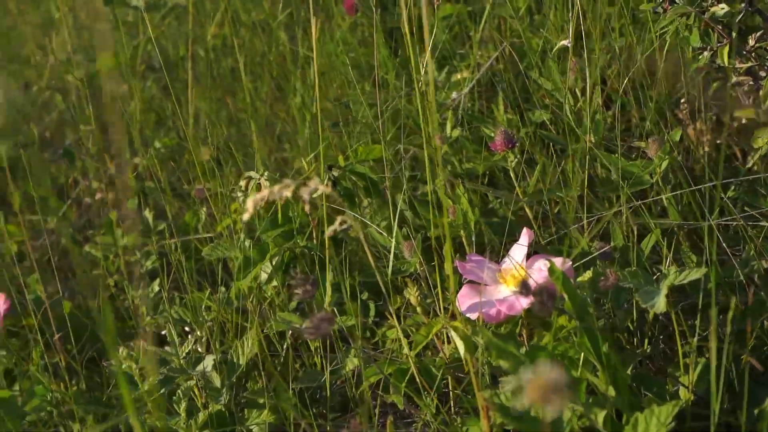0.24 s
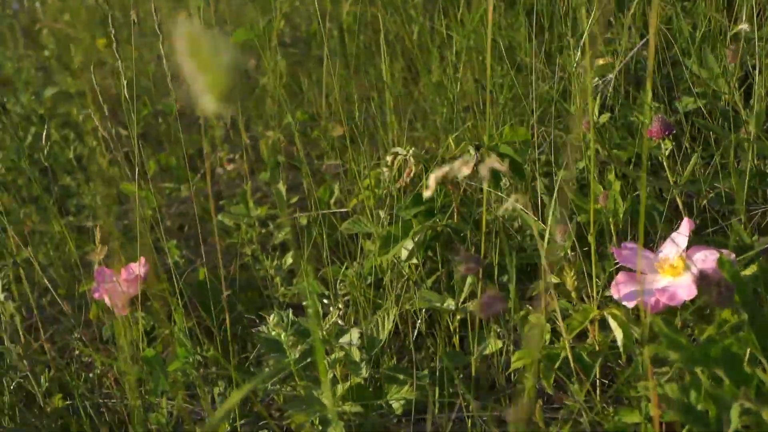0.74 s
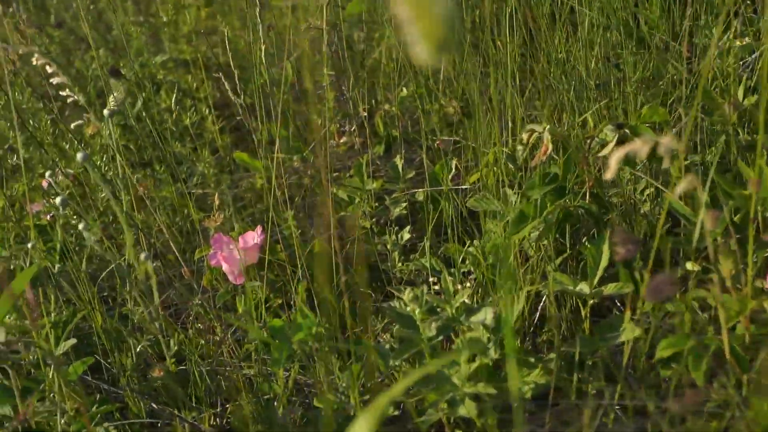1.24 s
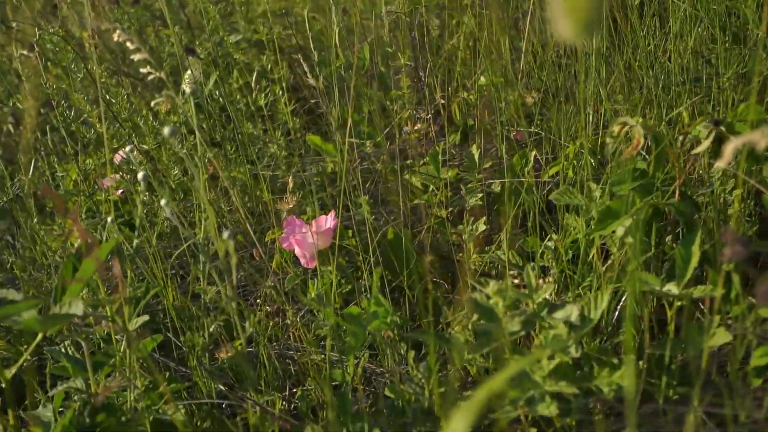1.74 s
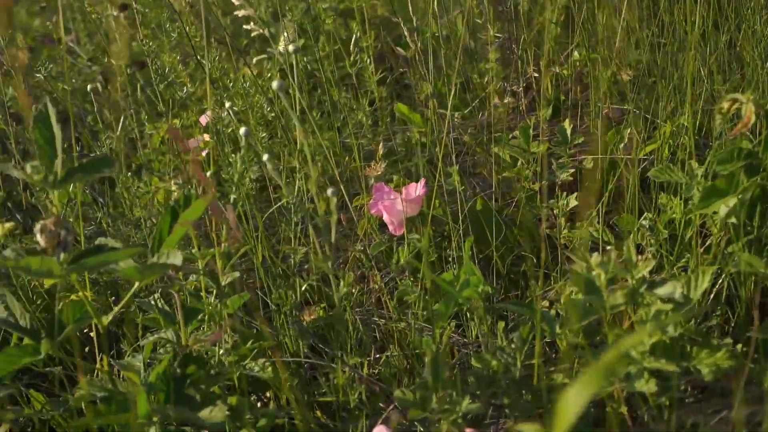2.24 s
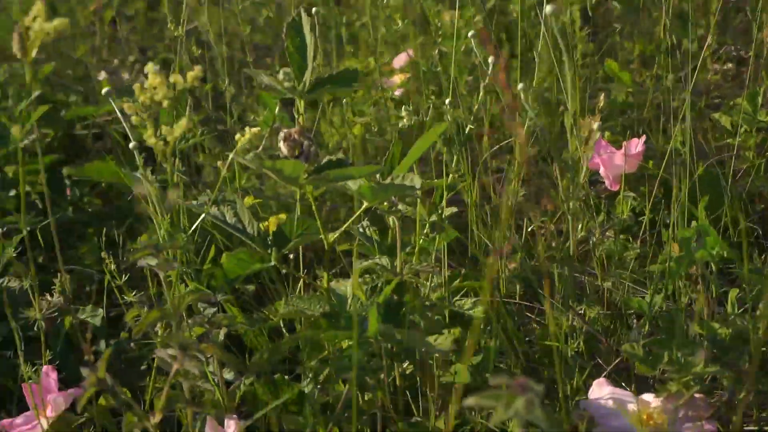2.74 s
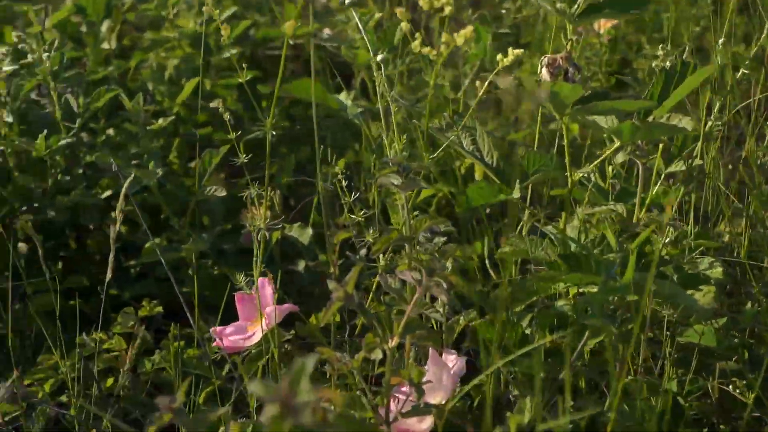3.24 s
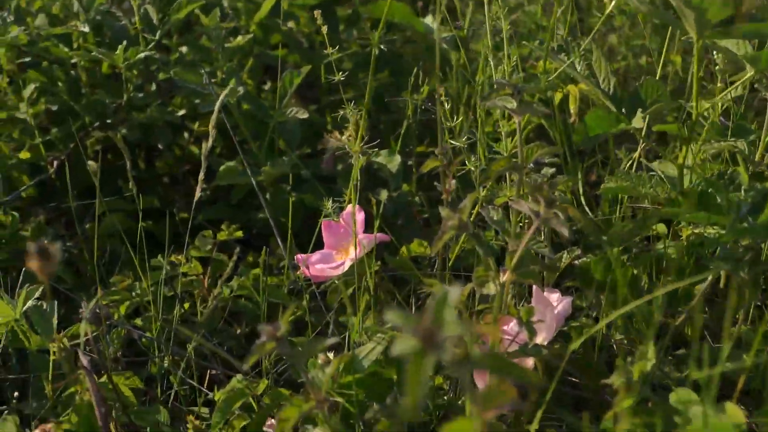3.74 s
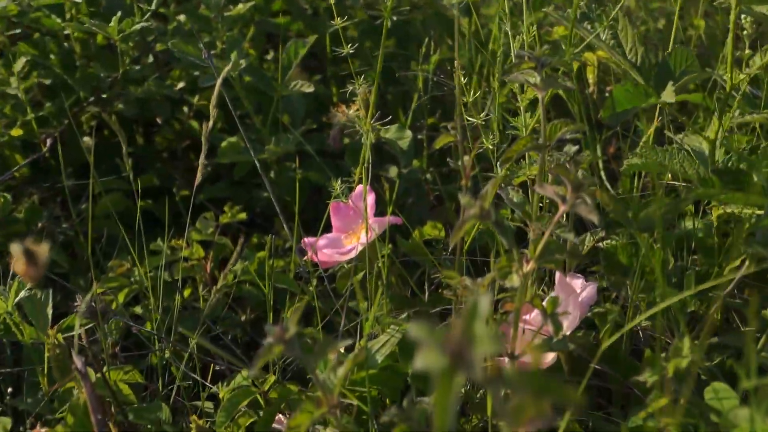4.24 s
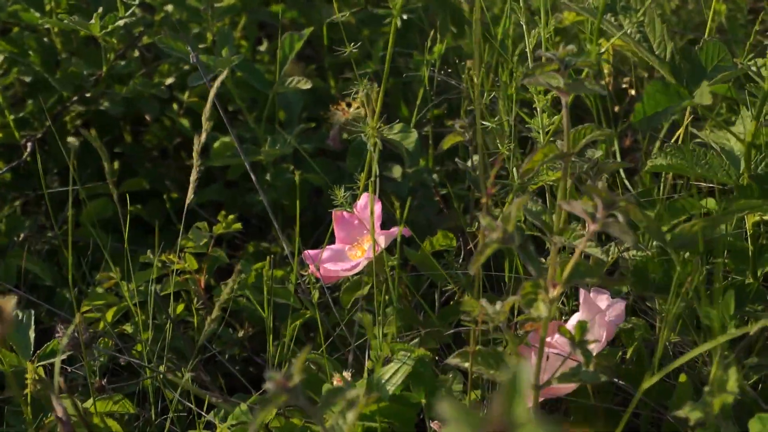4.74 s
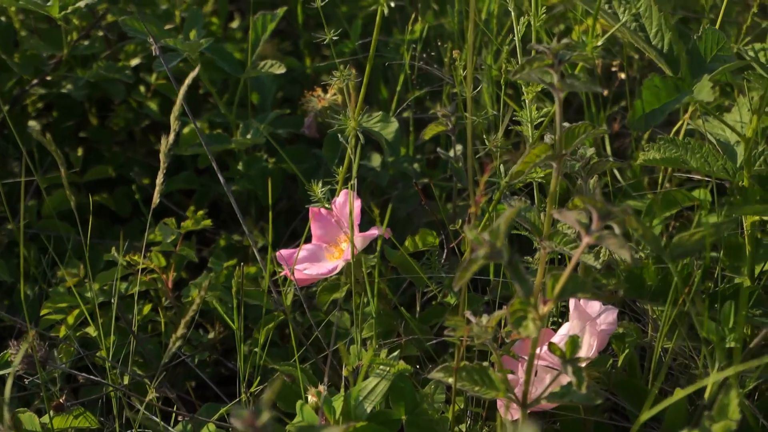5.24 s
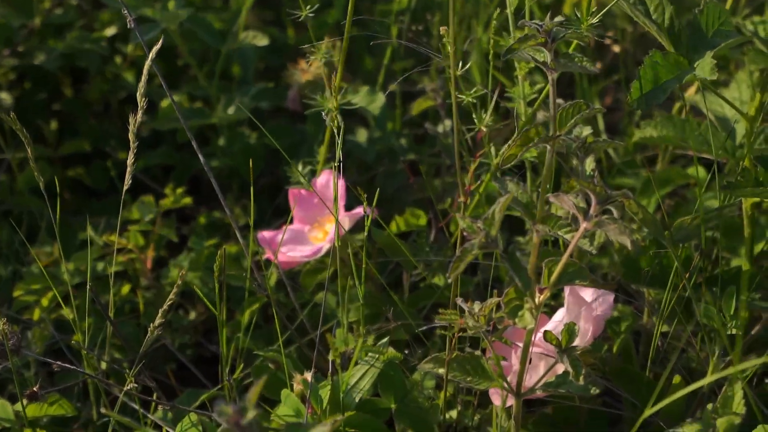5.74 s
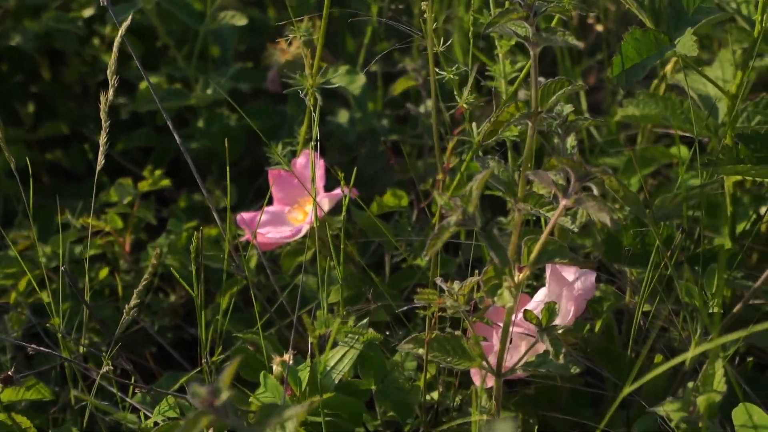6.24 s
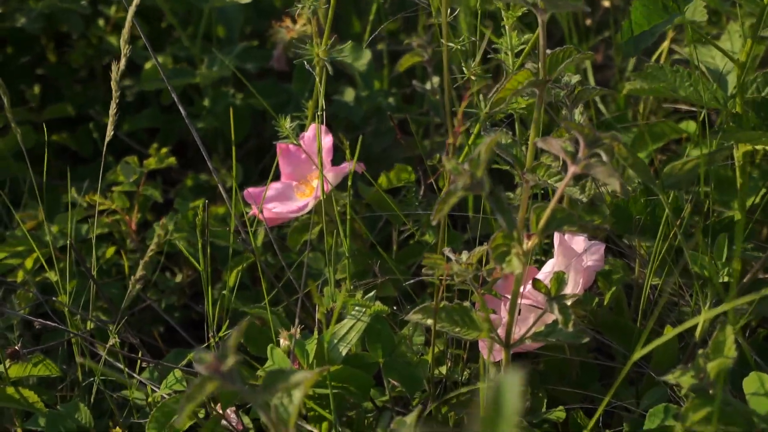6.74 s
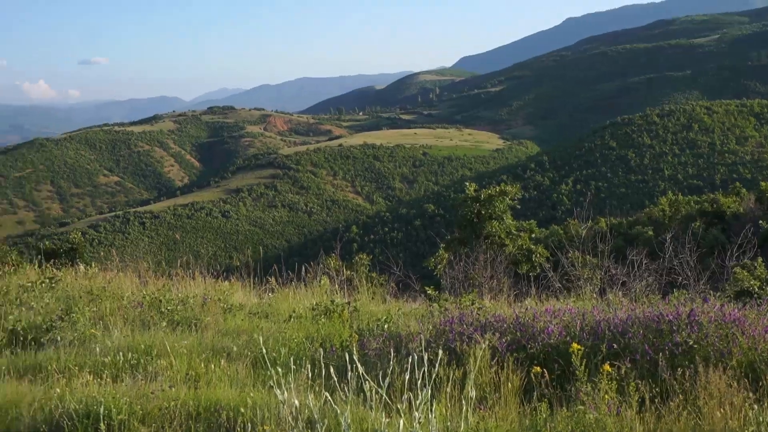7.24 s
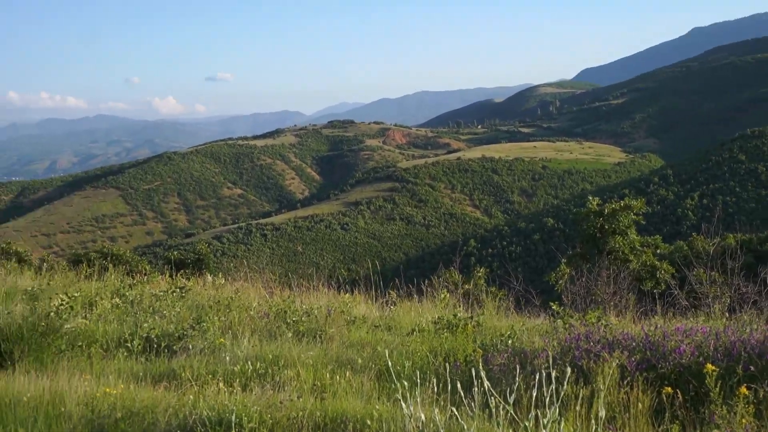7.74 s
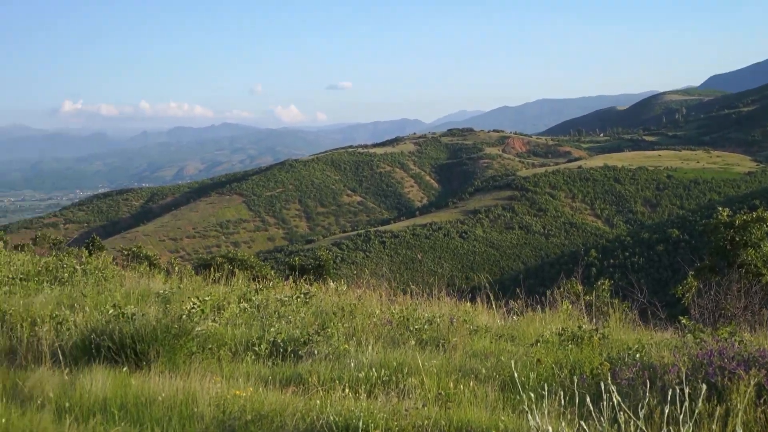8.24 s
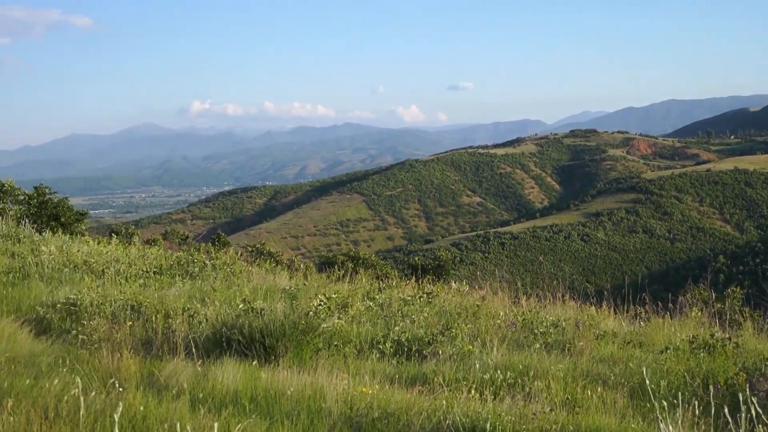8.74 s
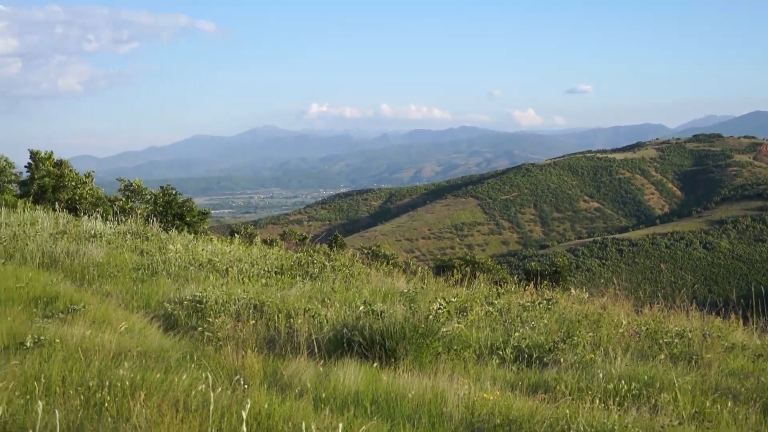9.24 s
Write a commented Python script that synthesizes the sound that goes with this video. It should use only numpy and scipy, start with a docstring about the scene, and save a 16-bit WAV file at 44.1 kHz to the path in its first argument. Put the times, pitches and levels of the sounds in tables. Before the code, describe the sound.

Several field crickets chirp in rapid overlapping pulses over faint meadow rustle, with deep wind buffeting the microphone and a late songbird warbling.

```python
"""Field crickets in a windy meadow

Near crickets stridulate: each chirp is four wing strokes, each stroke a short sagging tone near 5 kHz.
Shaped noise makes wind on a bare microphone, rustling leaves and a far chorus; clicks and knocks ring
the resonances of grass stalks and microphone housing; late on a songbird whistles, warbles and trills
in gliding sines. Decaying noise, convolved with crickets and bird, is the echo from the grass."""
import sys
import numpy as np
from scipy import signal
from scipy.fft import rfft, irfft
from scipy.io import wavfile
from scipy.ndimage import uniform_filter1d

SR = 44100
rng = np.random.default_rng(int(sys.argv[2]) if len(sys.argv) > 2 else 0)


def digitize_waveform(pressure):
    """Quantize a signal to 16-bit integers and store it at the path in sys.argv[1].

    Rows of a 2-D input are taken as channels; values are limited to [-1, 1].
    """
    field = np.atleast_2d(pressure).T
    bounded = np.clip(field, -1, 1)
    quanta = np.round(bounded * 32767).astype(np.int16)
    wavfile.write(sys.argv[1], SR, quanta)


N = 418950

# resonances of the microphone housing: f/Hz, relative level/dB, 60 dB decay time after a bump/s
HOUSING = [(141.6, 6.5, 0.25), (245, -18.5, 0.35)]
# share sent into the grass echo, rising toward 5 s and dropping near 7.2 s: t/s, level/dB
SCATTER = [(0, -16.5), (2.5, -11), (3.1, -7.5), (5, -6.5), (6.9, -7), (7.25, -14.5), (9.5, -13)]


def from_db(db):
    """Level to amplitude: 20 dB is a factor of ten."""
    return 10 ** (np.asarray(db) / 20)


def rms_one(x):
    """Normalization: division by the root mean square."""
    return x / np.sqrt(np.mean(x ** 2) + 1e-20)


def in_time(rows):
    """Linear interpolation of each column of a curve table at every sample."""
    s, *columns = np.transpose(rows)
    return [np.interp(np.arange(N) / SR, s, column) for column in columns]


def add(track, start_s, sound):
    """Superposition: a sound is summed into a track at its start time."""
    i = max(round(start_s * SR), 0)
    track[i:i + len(sound)] += sound[:N - i]


def drift(rate_hz):
    """Low-passed noise: a slow random curve of zero mean and spread 1."""
    step = 40  # samples between the points of the curve
    pole = np.exp(-2 * np.pi * rate_hz * step / SR)
    white = rng.standard_normal(N // step + 2002)
    slow = signal.lfilter([1], [1, -2 * pole, pole * pole], white)[2000:]  # past the onset
    return np.interp(np.arange(N) / step, np.arange(len(slow)), rms_one(slow - slow.mean()))


def coloured(spectrum):
    """Spectral shaping: white noise weighted by a spectrum over log frequency, rms 1."""
    hz, db = np.transpose(spectrum)
    grid_hz = np.arange(N // 2 + 1) * SR / N + 1  # +1 avoids log(0)
    gain = from_db(np.interp(np.log(grid_hz), np.log(hz), db))
    return rms_one(irfft(rfft(rng.standard_normal(N)) * gain, N))


def band_pass(x, low_hz, high_hz, order=2):
    """Band limiting: a Butterworth filter keeps one band."""
    return signal.sosfilt(signal.butter(order, [low_hz, high_hz], "band", fs=SR, output="sos"), x)


def ring(x, hz, t60):
    """Damped resonance: a unit click sets off a sine of initial height 1, 60 dB down after t60 seconds."""
    radius = from_db(-60 / (t60 * SR))
    angle = 2 * np.pi * hz / SR
    feedback = [1, -2 * radius * np.cos(angle), radius * radius]
    return signal.lfilter([0, np.sin(angle)], feedback, x + 1e-18)


def wind():
    """Turbulent pressure: lumpy low noise follows the gusts; the housing hums, more in strong rumble."""
    # gusts on the microphone: t/s, deep pressure level/dB, upper rumble level/dB
    gusts = [(0.0, -24, -22.5), (0.05, -21, -46), (0.45, -36, -48), (1.85, -43, -55), (2.56, -38.5, -44),
             (2.88, -20, -28), (3.6, -18.5, -33), (3.73, -9.5, -24), (4.39, -29.5, -38), (5.18, -16, -28),
             (6.08, -30.5, -40), (6.48, -19.5, -29.5), (6.82, -19, -38), (6.93, -34, -59), (7.33, -18, -20),
             (7.59, -19.5, -33.5), (8.65, -20.5, -27.5), (8.71, -6, -20.5), (8.89, -28, -34),
             (9.15, -4.5, -18), (9.34, -16, -29), (9.5, -32.5, -34)]
    # spectrum of the pressure: f/Hz, level per Hz/dB
    pressure_spectrum = [(5, -0.5), (16, -1), (30, -3.5), (89, -19), (146, -30.5), (222, -40.5), (300, -56),
                         (500, -81), (900, -114)]
    # handling keeps the housing humming: t/s, level/dB
    handling = [(0, -56), (.6, -48), (2.5, -46), (3.5, -49.5), (9.5, -49.5)]
    split_hz = 42

    def split(x, side):
        return signal.sosfilt(signal.butter(3, split_hz, side, fs=SR, output="sos"), x)

    deep_db, rumble_db = in_time(gusts)
    push = coloured(pressure_spectrum)
    # slow swells of the noise are evened out: the gusts set the level
    push = push / np.sqrt(uniform_filter1d(push ** 2, size=6000) + 0.061)
    deep = rms_one(split(push, "low"))
    rumble = rms_one(split(push, "high"))

    handling_gain = from_db(in_time(handling)[0] + 2.5 * drift(6))
    gust_gain = from_db(0.72 * rumble_db - 35.5 + 7.6 * drift(5.1))
    white = rng.standard_normal(N)
    # the hum is damped more than the ring of a bump
    hum = rms_one(sum(from_db(db) * rms_one(ring(white, hz, 0.42 * t60)) for hz, db, t60 in HOUSING))
    return from_db(deep_db) * deep + from_db(rumble_db) * rumble + (handling_gain + gust_gain) * hum


def air():
    """Broadband friction noise: meadow rustle, a lumpy murmur under it, a crackly dry-stalk hiss above."""
    # leaves in the breeze, with a short low thud at 7.23 s in the murmur column:
    # t/s, relative levels of murmur/dB, rustle/dB, hiss/dB
    breeze = [(0, -63, -58, -68.5), (2.3, -66, -55.5, -69), (3.2, -55, -55.5, -65.5),
              (4, -62, -56.5, -68.5), (5.9, -63.5, -56.5, -69), (6.55, -49, -55.5, -72),
              (7.17, -65.5, -56, -70.5), (7.23, -39.5, -54.5, -73), (7.3, -63.5, -56, -71.5),
              (9.5, -62.5, -56.5, -70.5)]
    # spectrum of the rustle: f/Hz, level per Hz/dB
    rustle_spectrum = [(150, -2.5), (330, -0.5), (630, 3.5), (800, -0.5), (1100, 0), (2000, -5.5),
                       (3300, -9.5), (5500, -9), (7000, -16), (15600, -49)]
    murmur_db, rustle_db, hiss_db = in_time(breeze)
    murmur_noise = rms_one(band_pass(rng.standard_normal(N), 165, 297))
    murmur = from_db(murmur_db + 3.0 * drift(8.5)) * murmur_noise
    crackle = rng.standard_normal(N) * from_db(1.2 * drift(60))
    hiss = from_db(hiss_db + 3.5) * rms_one(band_pass(crackle, 3400, 10700, order=1))
    rustle = from_db(rustle_db + 2.5 + 1.07 * drift(2.4)) * coloured(rustle_spectrum)
    return murmur + rustle + hiss


def stroke(hz, catch_hz, length_s, overtone_db, start_phase):
    """Stridulation: the scraper runs over the file in a swelling, sagging tone with weak overtones."""
    sag = 0.1127         # share by which the pitch falls as the file teeth spread out
    catch_s = 0.00296    # a scraper that catches starts sharp and settles with this time constant
    s = np.arange(int(length_s * SR)) / SR
    u = s / length_s
    pitch_hz = hz * (1 - sag * u ** 2.47) + catch_hz * np.exp(-s / catch_s)
    phase = start_phase + 2 * np.pi * np.cumsum(pitch_hz) / SR
    swell = np.sin(np.pi * u ** 0.69) ** 0.85
    overtones = np.sin(2 * phase) + from_db(-18) * np.sin(3 * phase)
    return swell * np.sin(phase) + from_db(overtone_db) * swell ** 1.06 * overtones


def chorus():
    """Random superposition: faint far strokes come in bunches, beyond them narrow noise throbs."""
    # farther crickets: f/Hz, base stroke rate/s^-1, median level/dB
    far_crickets = [(4840, 26, -59), (5170, 23, -63)]
    # shimmer of the farthest crickets: f/Hz, bandwidth/Hz, base level/dB
    shimmer_bands = [(4673, 150, -66.5), (4810, 280, -80)]
    out = np.zeros(N)
    for hz, per_s, db in far_crickets:
        chance = per_s * from_db(4.0 * drift(3)) / SR
        starts = (rng.random(N) < chance) * from_db(db + rng.normal(0, 2.0, N))
        out += signal.fftconvolve(starts, stroke(hz, 0, 0.022, -22.5, 0))[:N]
    for hz, width_hz, db in shimmer_bands:
        shimmer = band_pass(rng.standard_normal(N), hz - width_hz / 2, hz + width_hz / 2)
        out += from_db(db + 5.4 * drift(2.1)) * rms_one(shimmer)
    return out


def crickets():
    """Stridulation in chirps: four strokes each; stronger overtones bring a louder first-tooth tick."""
    # overtones of the higher singers, stronger from 7.2 s on: t/s, level/dB
    overtone_curve = [(0, -32), (7.15, -32), (7.25, -21.5), (9.5, -14.5)]
    # voices by name: f/Hz, extra pitch of the catch/Hz, stroke length/s, overtone offset/dB,
    # first stroke level/dB, second stroke level/dB
    voices = {"low": (4750, 0, .025, -10, -6, -2), "clear": (5080, 50, .021, 0, -7, -1.5),
              "harsh": (5130, 700, .0196, -2, -4, 0), "loud": (5140, 50, .021, 0, -10, -1.5)}
    # strokes of a chirp: t from the second stroke/stroke gaps, pitch above the voice/Hz
    chirp_strokes = [(-.85, -60), (0, -5), (1, 15), (2.08, 40)]
    # chirps: t of the second stroke/s, voice, stroke gap/s, level/dB
    chirps = [(.1866, "harsh", .0375, -43.5), (.19, "low", .0362, -38), (.329, "clear", 0.037, -36.5),
              (.487, "harsh", .0336, -42), (.5546, "low", .0361, -39), (.68, "clear", 0.037, -37),
              (.7774, "harsh", 0.037, -45.5), (.8585, "low", 0.037, -39), (1.0229, "harsh", .036, -44),
              (1.0685, "clear", 0.039, -36.5), (1.189, "low", 0.038, -37), (1.4467, "clear", 0.034, -37),
              (1.5097, "low", .0363, -38.5), (1.5645, "harsh", 0.032, -43.5),
              (1.8005, "clear", 0.036, -36.5), (1.842, "low", .0362, -40), (1.9564, "harsh", .0368, -44),
              (2.144, "low", 0.037, -40.5), (2.161, "clear", 0.037, -36), (2.303, "harsh", 0.032, -44.5),
              (2.4805, "low", .036, -40.5), (2.507, "clear", 0.036, -37.5), (2.6415, "harsh", 0.035, -47.5),
              (2.79, "low", 0.037, -42.5), (2.862, "clear", 0.039, -40), (2.97, "harsh", .033, -47),
              (3.107, "low", 0.034, -44), (3.254, "clear", 0.038, -43), (3.285, "harsh", 0.033, -42.5),
              (3.448, "low", 0.035, -46.5), (3.59, "clear", .0357, -40), (3.595, "harsh", 0.033, -42),
              (3.7785, "low", 0.036, -47), (3.894, "harsh", .0334, -46.5), (3.947, "clear", 0.035, -38.5),
              (4.111, "low", 0.039, -45.5), (4.21, "harsh", 0.032, -47), (4.314, "clear", 0.037, -38),
              (4.4337, "low", .0354, -46.5), (4.519, "harsh", .0312, -47), (4.676, "clear", 0.036, -41.5),
              (4.815, "harsh", 0.033, -47.5), (4.816, "low", .0385, -45.5), (5.0518, "clear", .0361, -38.5),
              (5.108, "low", 0.033, -47.5), (5.2075, "harsh", .0324, -46.5), (5.405, "clear", 0.037, -41.5),
              (5.43, "low", 0.033, -44), (5.4925, "harsh", 0.029, -47), (5.7468, "low", .0362, -44),
              (5.781, "harsh", 0.033, -45.5), (5.7945, "clear", .0364, -39.5), (6.0755, "low", 0.039, -45),
              (6.089, "harsh", 0.034, -46.5), (6.203, "clear", .0367, -40.5),
              (6.355, "harsh", .0309, -47.5), (6.405, "low", .0357, -45.5), (6.62, "clear", 0.038, -41),
              (6.672, "harsh", .0314, -46.5), (6.762, "low", .035, -46), (6.9785, "harsh", 0.033, -46),
              (6.984, "clear", 0.039, -38.5), (7.031, "low", 0.04, -42.5), (7.0796, "clear", 0.037, -38.5),
              (7.2533, "loud", .0335, -33), (7.313, "low", 0.034, -36.5), (7.334, "harsh", 0.031, -43.5),
              (7.4914, "clear", 0.037, -36), (7.585, "loud", 0.034, -31.5), (7.63, "low", 0.036, -38.5),
              (7.67, "clear", .033, -43), (7.879, "clear", .038, -42), (7.952, "loud", .0333, -29.5),
              (7.965, "low", .0355, -42), (8.216, "clear", .034, -42), (8.273, "low", 0.04, -40),
              (8.29, "loud", 0.034, -29), (8.475, "low", .0358, -48), (8.592, "low", 0.036, -41),
              (8.603, "clear", .035, -43), (8.629, "loud", .034, -29.5), (8.803, "low", 0.032, -50),
              (8.904, "low", .0376, -42), (8.935, "loud", .0331, -29.5), (9.095, "low", 0.037, -52),
              (9.2135, "low", .0375, -42.5), (9.274, "loud", .0339, -30), (9.32, "clear", .034, -47),
              (9.34, "low", 0.043, -46.5)]
    # the harsh singer's scraper now and then snaps free: t/s, level/dB
    snaps = [(3.047, -40), (3.9, -46), (3.9654, -48), (3.9774, -50), (4.2524, -45), (4.2867, -43),
             (4.5925, -45), (4.8898, -48), (5.5648, -45), (5.8506, -48), (6.3555, -47), (6.98, -53),
             (7.3432, -42), (7.4116, -41)]
    spread_db, spread_hz = 0.9, 30.6  # chance differences between strokes

    out, teeth, rasps, low = np.zeros((4, N))
    chance = rng.standard_normal((len(chirps), len(chirp_strokes), 3))
    for (second, voice, gap, chirp_db), draws in zip(chirps, chance):
        voice_hz, catch_hz, length_s, offset_db, first_db, second_db = voices[voice]
        # a catching scraper sounds harsher; the low singer is almost pure
        curve_db = np.interp(second, *np.transpose(overtone_curve))
        overtone_db = max(curve_db, -30 + 0.023 * catch_hz) + offset_db
        stroke_levels = (first_db, second_db, 0, 0)
        for (gaps, rise_hz), stroke_db, (a, b, turn) in zip(chirp_strokes, stroke_levels, draws):
            start = second + gaps * gap
            db = chirp_db + stroke_db + spread_db * a
            hz = voice_hz + rise_hz + spread_hz * b
            tone = stroke(hz, catch_hz, length_s, overtone_db, 2 * np.pi * turn)
            add(low if voice == "low" else out, start, from_db(db) * tone)
            add(teeth, start + 0.0018, from_db([db + overtone_db + 19.5]))
            add(rasps, start + 0.004, from_db([db + 8]) * catch_hz / 800)

    u = np.linspace(0, 1, int(0.0073 * SR))
    snap = np.sin(np.pi * u) * np.sin(2 * np.pi * np.cumsum(5400 + 800 * u) / SR)
    for start, db in snaps:
        add(out, start - 0.002, from_db(db) * snap)
        add(rasps, start, from_db([db + 13]))

    # the low singer's wing (harp) resonance rings on: a narrow ring hangs on between its strokes
    sent = from_db(in_time(SCATTER)[0] - 44.5) * low
    hanging = ring(sent, 4720, 0.21) * from_db(3.1 * drift(40))
    # a catch also spits in the high treble
    clicks = band_pass(teeth, 5300, 7500) + band_pass(rasps, 11300, 13200)
    return out + low + hanging + clicks


def grass_echo(x):
    """Diffuse scattering: stalks and slopes spread the sound into a short, smooth, decaying tail."""
    t60_s, onset_s = 0.26, 0.0062
    s = np.arange(int(0.3 * SR)) / SR
    tail = rng.standard_normal(len(s)) * from_db(-60 * s / t60_s) * np.clip(s / onset_s, 0, 1)
    unit_tail = tail / np.sqrt(np.sum(tail ** 2))
    return signal.fftconvolve(from_db(in_time(SCATTER)[0]) * x, unit_tail)[:N]


def ticks():
    """Impulse excitation: a stalk snaps back, one click rings its modes under a bright noise burst."""
    # ticks of grass and stalks: t/s, relative level/dB, relative treble level/dB
    snap_backs = [(0.2489, -38, -73), (0.4304, -35.5, -70), (0.6978, -45, -68), (0.84, -35, -69),
                  (1.053, -44, -67), (1.3987, -42, -70), (1.436, -32.5, -74), (1.6954, -56, -68),
                  (2.2343, -39, -71), (2.4394, -45, -62), (2.8184, -44, -60.5), (3.187, -53, -60),
                  (3.2164, -50, -65), (3.288, -51, -60), (3.5914, -59, -63), (3.7304, -54, -63),
                  (4.6663, -42, -74), (4.7035, -38, -73), (4.998, -39, -76), (5.5889, -29, -58),
                  (5.9441, -37.5, -77), (9.172, -42, -77)]
    # modes of a dry stalk: f/Hz, relative level/dB, 60 dB decay time/s
    stalk_modes = [(770, -4.5, 0.0085), (1750, -1, 0.007), (3220, -6, 0.0047)]
    s = np.arange(int(0.014 * SR)) / SR
    clicks, bright = np.zeros((2, N))
    bursts = rng.standard_normal((len(snap_backs), len(s)))
    for (start, db, treble_db), burst in zip(snap_backs, bursts):
        add(clicks, start, from_db([db + 2.0]))
        add(bright, start, from_db(treble_db + 24) * burst * np.exp(-s / 0.0012))
    woody = sum(from_db(db) * ring(clicks, hz, t60) for hz, db, t60 in stalk_modes)
    return woody + band_pass(bright, 4900, 9000)


def bumps():
    """Impulse excitation: soft knocks set the resonances of the housing ringing."""
    # bumps on the housing: t/s, knock strength/dB
    knock_times = [(0.61, -30), (2.427, -33.5), (2.598, -23.5), (2.614, -10.5), (2.792, -14.5)]
    knocks = np.zeros(N)
    for start, db in knock_times:
        add(knocks, start, from_db(db) * np.hanning(90) / 45)
    long_ring = sum(from_db(db - 9) * ring(knocks, hz, t60) for hz, db, t60 in HOUSING)
    return long_ring + ring(knocks, 151.7, 0.11)


def birds():
    """Frequency and amplitude modulation: near sines glide, shake in warbles, break into beats in trills."""
    # whistles: start t/s, length/s, first f/Hz, middle f/Hz, last f/Hz, level/dB
    whistles = [(7.198, 0.041, 1990, 2520, 1800, -55.5), (7.268, .035, 3780, 4100, 4000, -59),
                (7.31, .03, 3870, 4050, 4150, -57), (7.854, .087, 1790, 1910, 1960, -64),
                (7.91, 0.048, 4230, 4310, 3920, -47), (8.01, .1, 2000, 1980, 1900, -58),
                (8.113, .061, 1890, 2200, 2950, -50.5), (8.153, 0.041, 2840, 2620, 2480, -47),
                (8.412, 0.063, 1960, 1930, 1840, -55), (8.48, .018, 1680, 1620, 1550, -53.5),
                (8.614, .039, 2630, 3180, 3750, -40), (8.639, .023, 3650, 3220, 2640, -39.5),
                (8.728, 0.035, 2310, 2170, 1960, -50), (8.764, 0.029, 2850, 2640, 2530, -47),
                (8.734, .016, 5450, 5650, 5900, -49)]
    # buzzes and trills: the same six columns, then
    # beat rate/s^-1, pitch swing either way in a beat/Hz, full-level share of a beat
    trills = [(7.44, 0.074, 3950, 3840, 3810, -51, 130, 400, 0.49),
              (7.742, 0.11, 4100, 4040, 3995, -42.5, 108, 330, 0.59),
              (7.951, 0.1, 3700, 3510, 3390, -39.5, 122, 307, 1),
              (8.211, 0.066, 3430, 4100, 3600, -40.5, 151.5, -600, .62),
              (8.285, 0.13, 2960, 2913, 2890, -37.5, 49.5, 40, 0.7),
              (8.552, 0.048, 3910, 4060, 3570, -36, 150, 500, 0.42),
              (8.797, 0.23, 3120, 3125, 3075, -46, 69, -320, 0.21),
              (8.8, 0.133, 3050, 2930, 2870, -50, 66, 0, 0.6)]
    out = np.zeros(N)
    notes = [whistle + (0, 0, 1) for whistle in whistles] + trills
    for start, length_s, first_hz, middle_hz, last_hz, db, per_s, swing_hz, share in notes:
        u = np.arange(int(length_s * SR)) / (length_s * SR)
        beat = per_s * length_s * u % 1
        glide_hz = np.interp(u, [0, 0.5, 1], [first_hz, middle_hz, last_hz])
        pitch_hz = glide_hz + swing_hz * np.cos(2 * np.pi * beat)
        gate = uniform_filter1d(np.where(beat < share, 1, 0.12), size=60)
        swell = np.sin(np.pi * u ** 1.5) ** 0.28
        add(out, start, from_db(db) * swell * gate * np.sin(2 * np.pi * np.cumsum(pitch_hz) / SR))
    return out * from_db(2.3 * drift(100))  # leaves in the path make the notes flutter


def scene():
    """Superposition: singers and their echo in the grass, wind and knocks at the microphone."""
    insects, bird = crickets(), birds()
    echo = grass_echo(insects + from_db(-3) * bird)  # the bird sings above the grass
    return (insects + bird + echo + chorus() + air() + ticks() + bumps() + wind())[None]


def record(dry):
    """Overload and band limiting: the strongest gust clips at the input, a steep low-pass cuts the top."""
    low_pass = signal.ellip(14, 0.5, 60, 15795, fs=SR, output="sos")  # order, ripple dB, stop dB, Hz
    return signal.sosfilt(low_pass, np.clip(dry, -1, 1))


dry = scene()
out = record(dry)
digitize_waveform(out)
```